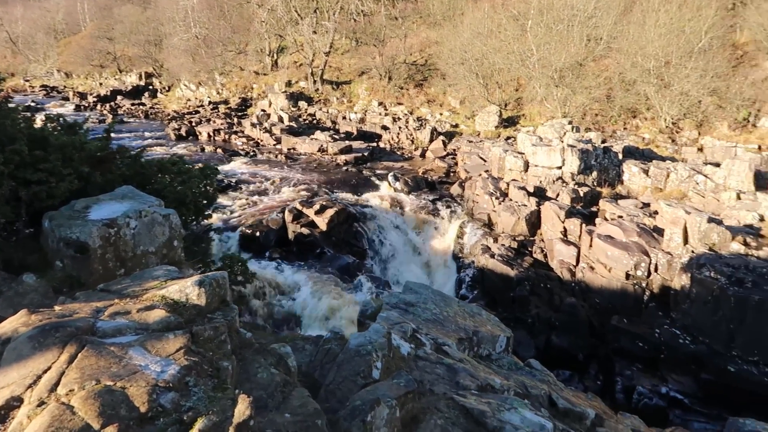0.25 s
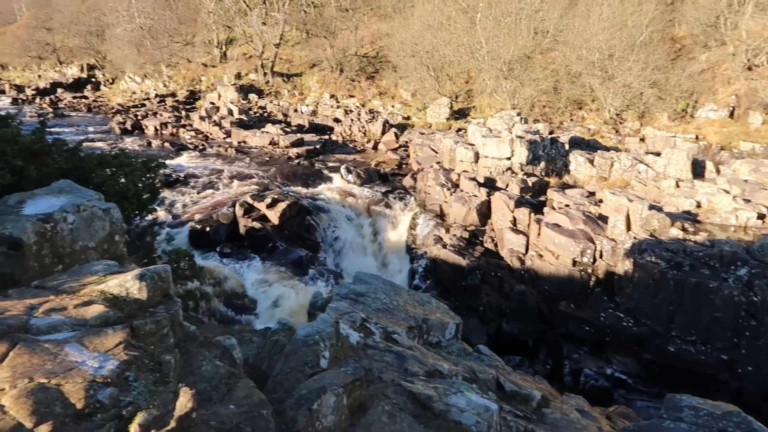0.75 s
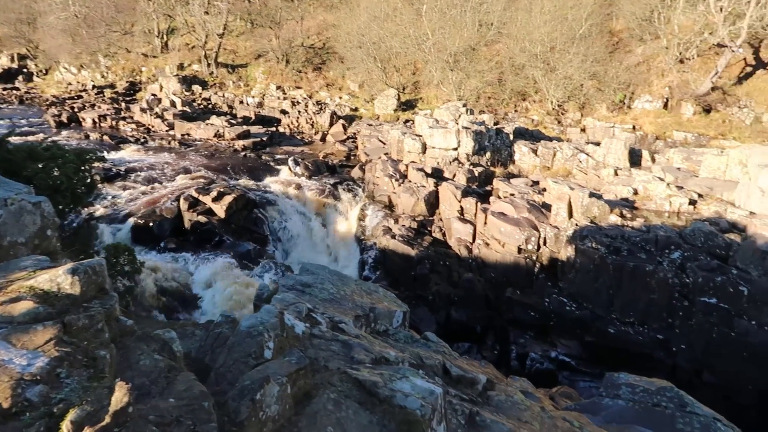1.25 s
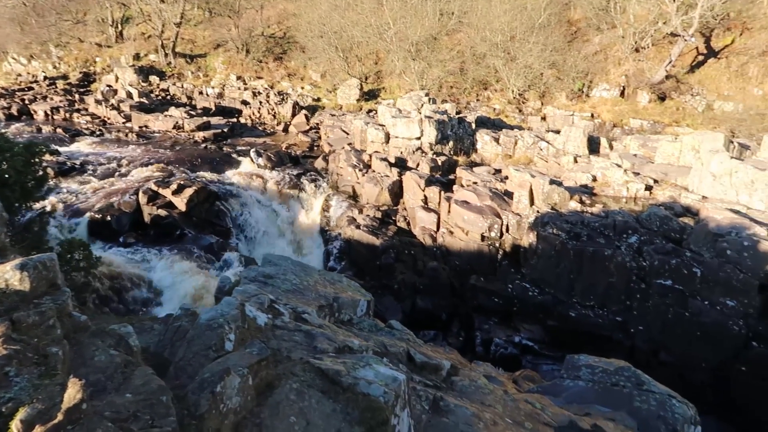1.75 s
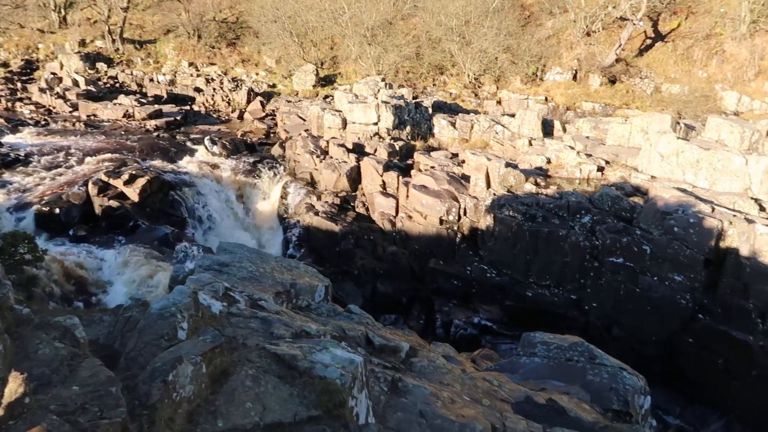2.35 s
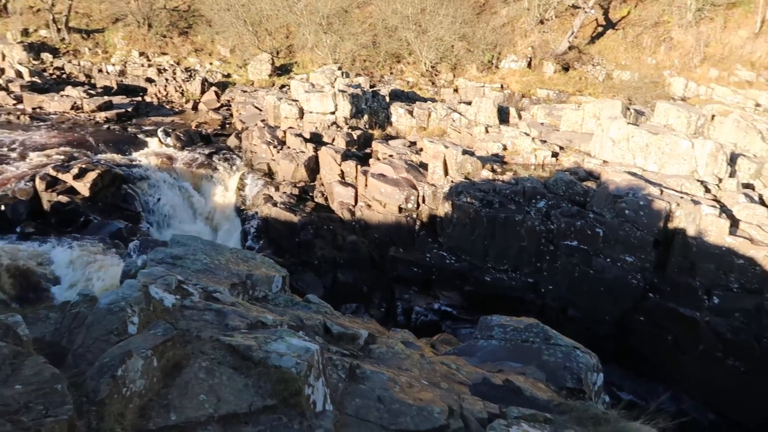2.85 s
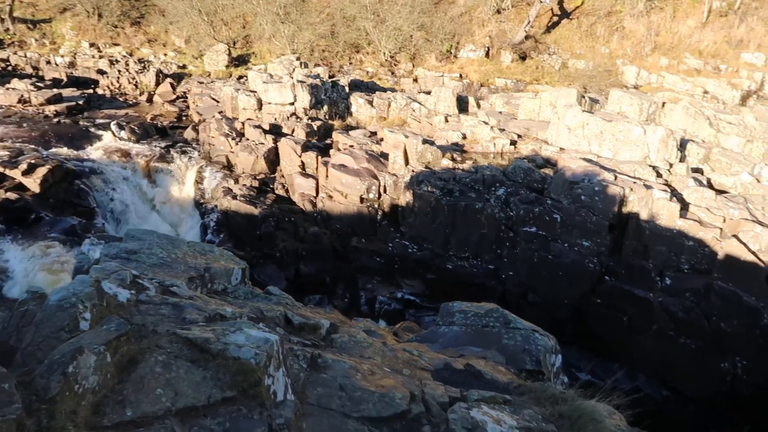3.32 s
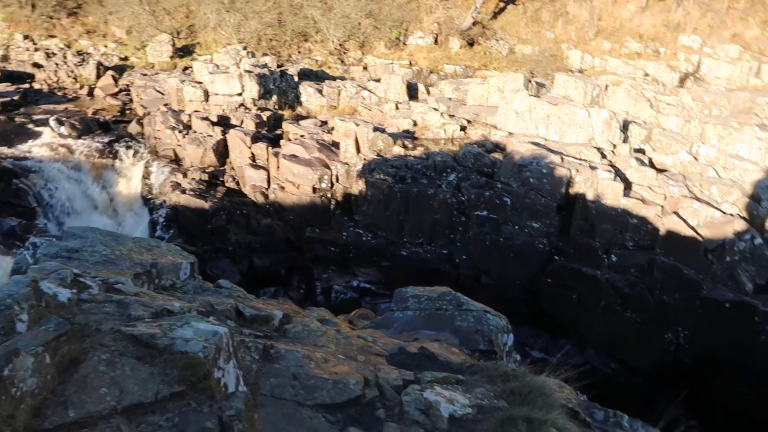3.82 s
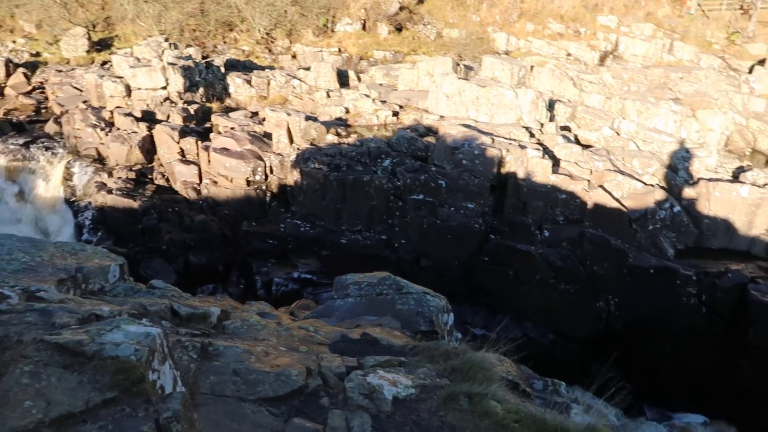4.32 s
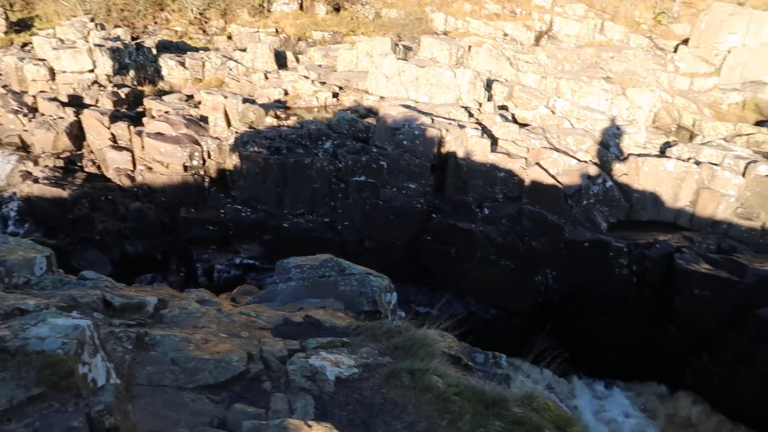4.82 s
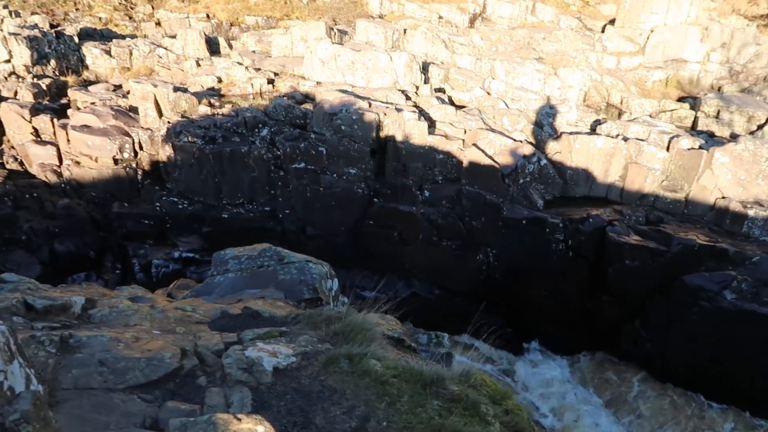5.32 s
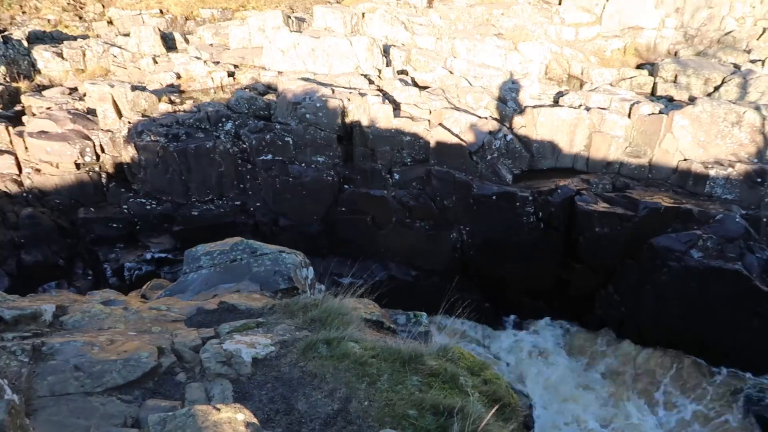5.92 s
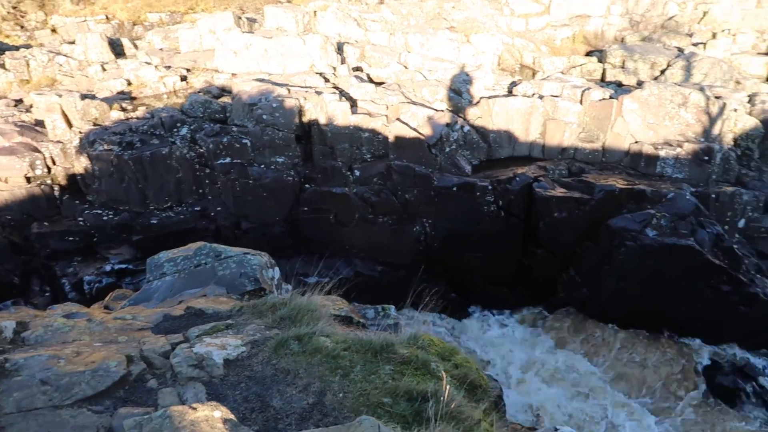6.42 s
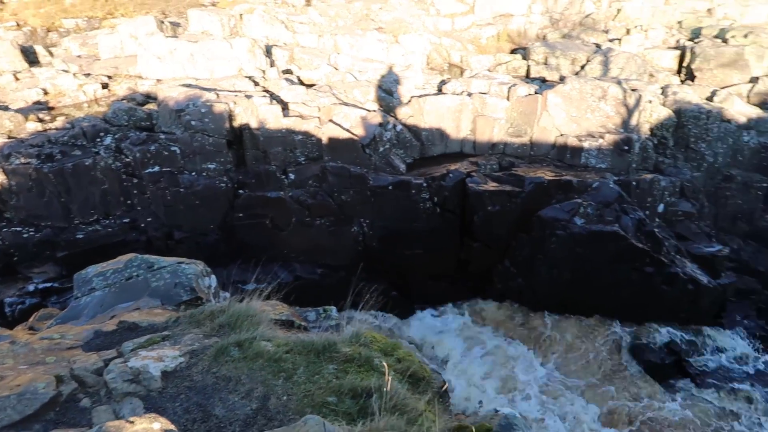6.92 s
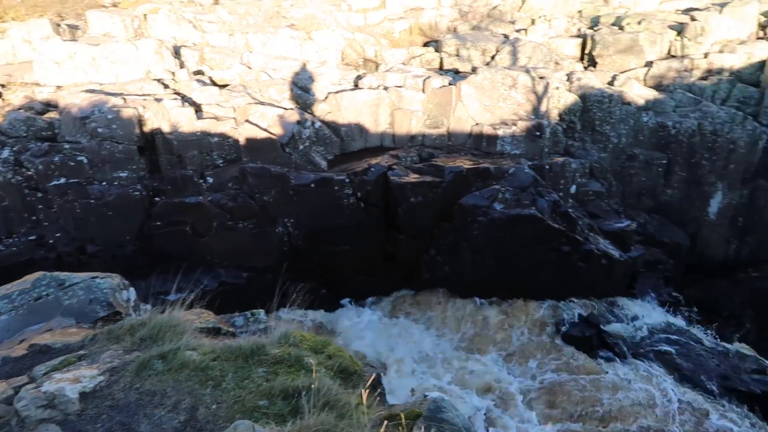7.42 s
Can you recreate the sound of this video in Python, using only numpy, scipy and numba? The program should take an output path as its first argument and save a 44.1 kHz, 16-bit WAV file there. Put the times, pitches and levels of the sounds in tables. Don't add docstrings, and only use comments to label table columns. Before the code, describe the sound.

Loud, steady rush of heavy white water outdoors, with low uneven booms from the plunge pool and crisp spray hiss growing clearer midway.

```python
import sys
import numpy as np
from scipy import signal
from scipy.fft import rfft, irfft, next_fast_len
from scipy.io import wavfile
from scipy.ndimage import map_coordinates
from numba import njit

SR = 44100
rng = np.random.default_rng(int(sys.argv[2]) if len(sys.argv) > 2 else 0)


def bounce(signal):
    frames = np.transpose(np.atleast_2d(signal))
    limited = np.clip(frames, -1, 1)
    pcm = np.round(limited * 32767).astype(np.int16)
    wavfile.write(sys.argv[1], SR, pcm)


def voltage_ratio(level):
    return 10 ** (np.asarray(level, float) / 20)


N = 337806


# (time [s], level [dB])
FLOW = [
    (0, -20.5),
    (1.1, -19.5),
    (1.75, -19.5),
    (2.3, -19.5),
    (2.85, -20.5),
    (3.75, -19.5),
    (5.3, -19.5),
    (6.1, -20.5),
    (6.75, -19.5),
    (7.66, -19.5),
]
# (time [s], aim [0-1])
AIM = [(0, 0.36), (.75, 0.45), (1.2, .48), (1.4, 0.6), (1.65, .52), (2.1, .5), (2.45, 0.46), (2.72, .56),
       (2.95, 0.58), (3.75, 0.74), (4.3, 1.02), (4.75, 1.04), (5.3, 0.93), (5.62, 1.02), (5.95, 0.8),
       (6.45, 1.0), (7.1, .84), (7.4, 0.6), (7.66, 0.8)]


def white_water(streams):
    hz, times, cells = signal.stft(streams, SR, nperseg=512)
    flow_db = np.interp(times, *np.transpose(FLOW))
    aim = np.interp(times, *np.transpose(AIM))

    boom_db = (0.85 - 1) * (flow_db + 19.5)
    spray_db = 6.5 * (aim - 0.78)
    low = table([(200, 0.74), (350, 0.095)], hz)[:, None]
    high = table([(3000, 0), (9000, 1)], hz)[:, None]

    gusty = table([(150, .2), (400, .6), (1000, .9), (2500, 1.), (8000, .45)], hz)[:, None]
    surge_db = zone_surges(hz, times) + ledge_splashes(times)
    cells = cells * voltage_ratio(flow_db + low * boom_db + high * spray_db + gusty * surge_db)
    cells[1:] *= voltage_ratio(scattered_treble_db(hz, times, aim, high))
    return signal.istft(cells, SR, nperseg=512)[1][:, :N]


def zone_surges(hz, times):
    zone = 2 * np.log2(np.maximum(hz, 60.) / 60.)
    shared = np.repeat(walk(6., count=5, times=times), 4, axis=0)
    level_db = 0.3 * shared + 0.74 * walk(16., count=20, times=times)
    below = zone.astype(int)
    between = (zone - below)[:, None]
    return level_db[below] + between * (level_db[below + 1] - level_db[below])


# (time [s], level [dB])
SLUGS = [(.4, 2), (1.85, 1), (2.42, 1), (2.9, 1.5), (3.4, 0.9), (3.7, .6), (4.0, -0.1), (4.35, 0.7),
         (5.45, 0.7), (6.2, 1.1), (6.65, 1), (7.0, 2.1), (7.55, 2)]


def ledge_splashes(times):
    return sum(db * np.exp(-((times - start) / 0.11) ** 2) for start, db in SLUGS)


# (time [s], pitch [Hz], level [dB])
BOOMS = [(.1, 200, -5), (.52, 60, 3), (.5, 400, 2), (.7, 900, -1), (1.1, 280, 1), (1.1, 500, 6),
         (1.26, 64, 14), (.85, 105, -3), (1.55, 150, -2), (1.55, 540, 3), (1.58, 780, -2), (6.7, 270, 2.5),
         (7.18, 200, -3), (1.8, 95, 1), (1.95, 500, 4.5), (2.05, 150, 3), (2.1, 560, 3), (2.3, 88, 4),
         (2.35, 402, 1.5), (2.82, 70, 1), (3.2, 65, 3), (3.35, 454, 4), (3.5, 75, 6), (3.95, 55, 6),
         (4.18, 120, 3), (4.45, 193, 4.5), (4.95, 170, 1.5), (5.05, 350, 5.5), (5.16, 165, 6.5),
         (5.45, 80, 11), (6.1, 124, 5.5), (6.2, 280, 3), (6.35, 500, -5), (6.6, 88, 6), (6.7, 400, -2.5),
         (7.1, 100, 7.5), (7.22, 100, 8), (7.3, 500, -6), (7.45, 188, 6.5)]


def pool_booms(stream):
    half_s, half_octaves = 0.075, 0.18
    hz, times, cells = signal.stft(stream, SR, nperseg=4096, noverlap=3072)
    octave = np.log2(np.maximum(hz[:120, None], 1))
    lift_db = 0
    for start, pitch, db in BOOMS:
        distance = ((times - start) / half_s) ** 2 + ((octave - np.log2(pitch)) / half_octaves) ** 2
        lift_db = lift_db + db * np.exp(-distance)
    cells[:120] *= voltage_ratio(lift_db)
    return signal.istft(cells, SR, nperseg=4096, noverlap=3072)[1][:N]


def bubbles(count, low_hz, high_hz, cycles, scatter_db):
    when, pitch, life, big = rng.random((count, 4)).T
    hz = low_hz * (high_hz / low_hz) ** pitch
    size = voltage_ratio(-scatter_db * np.log(1 - big)) * hz
    out = ring((when * N).astype(np.int64), hz, cycles * (.5 + life), size, 0.0873)
    return out / out.std()


@njit
def ring(start, hz, cycles, size, glide):
    out = np.zeros(N)
    for g in range(len(start)):
        length = int(cycles[g] * SR / hz[g])
        phase = 0.
        for i in range(min(4 * length, N - start[g])):
            phase += 2 * np.pi * hz[g] * (1 + glide * i / length) / SR
            out[start[g] + i] += size[g] * np.exp(-i / length) * np.sin(phase)
    return out


# (time [s], pitch [Hz], level [dB])
FLECKS = [(.11, 14700, 10), (.79, 14500, 10), (1.16, 14000, 10), (1.51, 14600, 12), (1.7, 14700, 12),
          (1.77, 14000, 10), (1.84, 13700, 8), (2.08, 10500, 9), (2.14, 13600, 8), (2.5, 13900, 10),
          (2.72, 14000, 12), (2.73, 12300, 6), (2.81, 14200, 12), (2.97, 12800, 7), (3.04, 12600, 8),
          (3.11, 11500, 6), (3.25, 12000, 10), (3.4, 11500, 10), (3.51, 11300, 5), (3.53, 12600, 9),
          (3.65, 11200, 9), (3.74, 11600, 14), (3.98, 9500, 11), (4.04, 11800, 14), (4.05, 10100, 7),
          (4.13, 9300, 7), (4.18, 13700, 23), (4.295, 9550, 10), (4.345, 11100, 14), (4.56, 10000, 8),
          (4.6, 10700, 11), (4.64, 9500, 11), (4.88, 9700, 12), (5.11, 13300, 19), (5.11, 9300, 3),
          (5.157, 11300, 17), (5.157, 10100, 12), (5.24, 9600, 9), (5.28, 11700, 12), (5.3, 10000, 7),
          (5.41, 11200, 12), (5.42, 9700, 11), (5.46, 10900, 9), (5.61, 10700, 16), (5.71, 9900, 8),
          (5.82, 9800, 7), (5.93, 11100, 8), (6.04, 11450, 6), (6.08, 9300, 6), (6.22, 10000, 8),
          (6.24, 11300, 12), (6.33, 10000, 10), (6.56, 10000, 11), (6.68, 9300, 7), (6.78, 10800, 7),
          (6.805, 12600, 13), (6.88, 10000, 11), (6.945, 10700, 12), (7.33, 11500, 11), (7.45, 11400, 12)]


def treble_flecks(hz, times):
    half_s, half_hz = 0.015, 520
    lift_db = 0
    for start, pitch, db in FLECKS:
        distance = ((times - start) / half_s) ** 2 + ((hz[:, None] - pitch) / half_hz) ** 2
        lift_db = lift_db + db * np.exp(-distance)
    return lift_db


def scattered_treble_db(hz, times, aim, high):
    by_band = np.repeat(walk(25., count=129, times=times), 2, axis=0)[:len(hz)]
    waver_db = 0.3 * walk(30., count=1, times=times) + 2.9 * by_band
    waver_db = waver_db + treble_flecks(hz, times)
    loss_db = table([(3000, 1.5), (8800, 11.5), (11000, 15.5), (13500, 23)], hz)[:, None]
    return high * waver_db - loss_db * (aim - 0.5)


# (frequency [Hz], density [dB per Hz])
WATER = [(8, -45), (22, -17), (40, -7), (70, -3), (200, -2.5), (290, -6.5), (500, -9.5), (1000, -15.5),
         (2000, -21.5), (3300, -24.5), (4800, -29), (6500, -30.5), (8000, -34), (11800, -39), (13500, -46),
         (15200, -57)]
# (frequency [Hz], width [Hz], level [dB])
GORGE = [
    (89, 11.5, 4),
    (134, 28, 1.5),
    (166, 18, 2),
]


def gorge_colour(hz):
    basin_db = sum(db / (1 + (2 * (hz - mode) / width) ** 2) for mode, width, db in GORGE)
    return table(WATER, hz) + basin_db + 23.5


# (frequency [Hz], share [0-1])
STRAIGHT = [(40, .99999), (90, .99975), (200, .998), (500, .988), (1000, .94), (1600, .8), (3000, .72),
            (6000, .55), (7900, .5), (8300, .69), (9200, .65), (11000, .66), (13000, .66), (15000, .55)]
# (frequency [Hz], left lead [rad])
PORT_PHASE = [(0, 0), (120, .008), (400, .08), (1000, -.15), (3200, -.9), (6000, -2), (8500, -3.1),
              (15000, -3.14)]
# (frequency [Hz], left minus right [dB])
SHADOW = [(150, 0), (370, -.7), (680, -1.3), (1250, -2.9), (1800, -3.7), (4200, -2.2), (8000, 0),
          (14000, 0)]
# (frequency [Hz], level [dB])
STRAIGHT_COLOUR = [(8500, 0), (10000, 1.5), (11500, 3), (13000, 0), (14000, -1.5)]


def two_ports(straight, scattered, hz):
    share = np.clip(table(STRAIGHT, hz), 0, 1)
    side = np.array([[.5], [-.5]])
    lead = np.exp(1j * side * np.interp(hz, *np.transpose(PORT_PHASE)))
    direct = np.sqrt(share) * lead * straight * voltage_ratio(table(STRAIGHT_COLOUR, hz))
    diffuse = np.sqrt(1 - share) * scattered
    return (direct + diffuse) * voltage_ratio(side * table(SHADOW, hz))


def table(rows, hz):
    at, value = np.transpose(rows)
    return np.interp(np.log(np.maximum(hz, 1)), np.log(at), value)


def walk(rate, count, times):
    knots = rng.standard_normal((count, int(rate * N / SR) + 3))
    return np.array([map_coordinates(row, [times * rate], order=3) for row in knots])


def scene():
    streams = rng.standard_normal((3, N))
    streams[0] += voltage_ratio(-12) * bubbles(count=7000, low_hz=347.7, high_hz=6060, cycles=5.43, scatter_db=2.0)
    streams[0] = pool_booms(streams[0])
    size = next_fast_len(N)
    hz = np.fft.rfftfreq(size, 1 / SR)
    straight, *scattered = rfft(white_water(streams), size) * voltage_ratio(gorge_colour(hz))
    return irfft(two_ports(straight, scattered, hz), size)[:, :N]


def top_cut(x):
    return signal.sosfilt(signal.butter(12, 15200, fs=SR, output="sos"), x)


def record(dry):
    limited = np.tanh(.1 * dry) / .1
    return top_cut(limited)


dry = scene()
out = record(dry)
bounce(out)
```